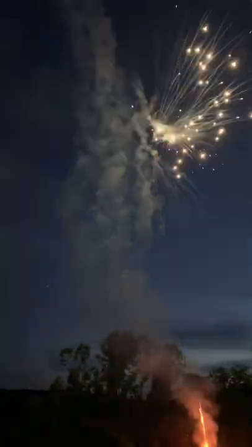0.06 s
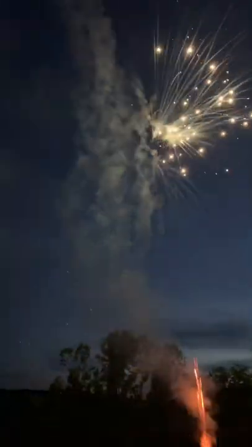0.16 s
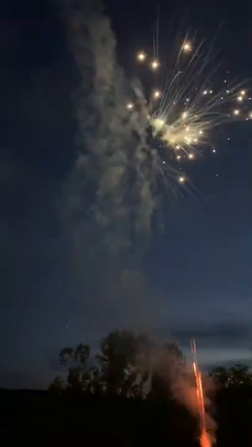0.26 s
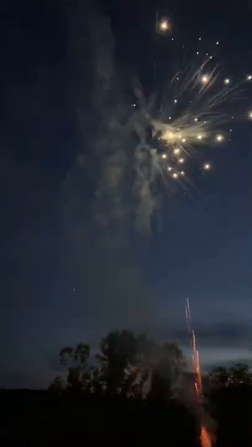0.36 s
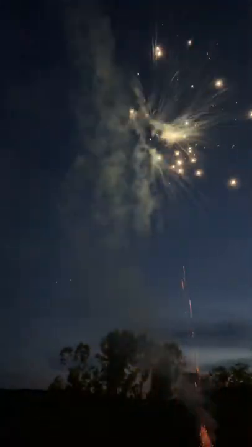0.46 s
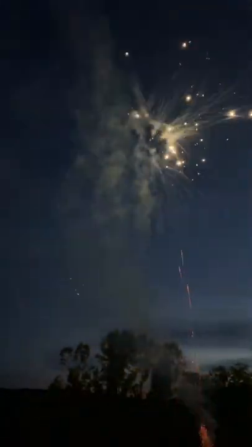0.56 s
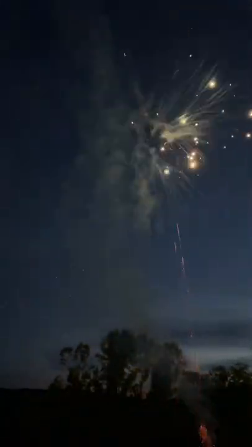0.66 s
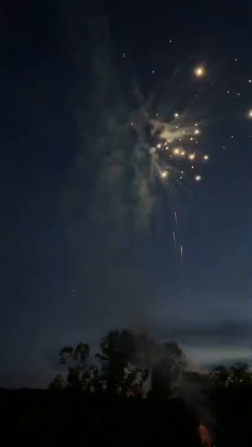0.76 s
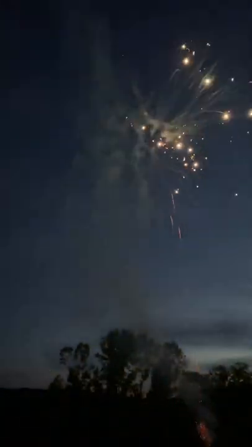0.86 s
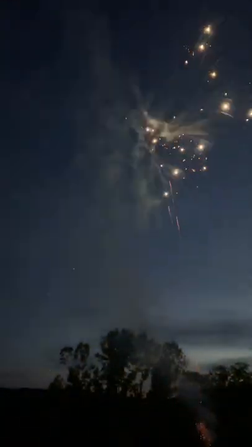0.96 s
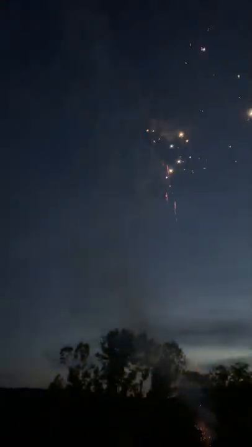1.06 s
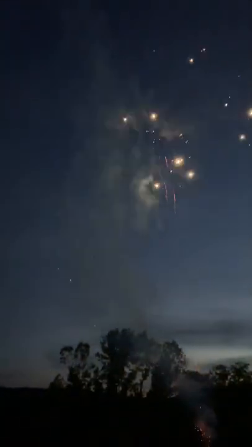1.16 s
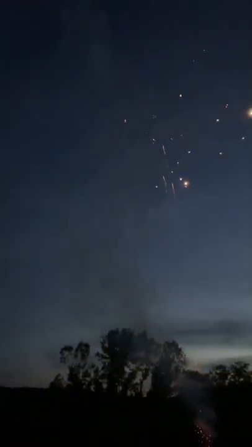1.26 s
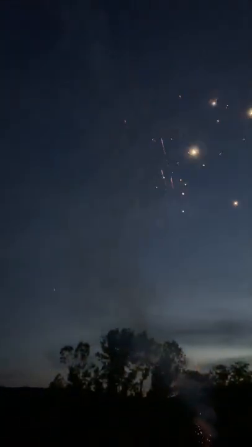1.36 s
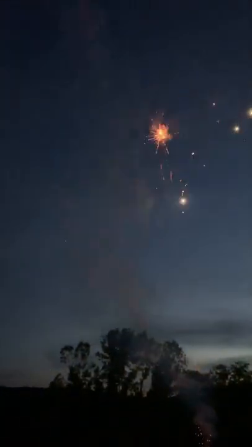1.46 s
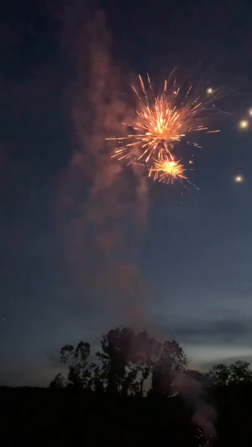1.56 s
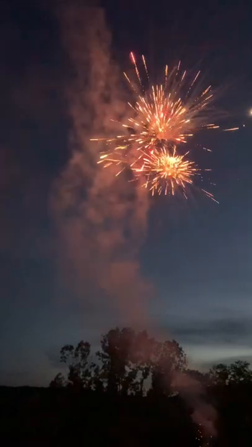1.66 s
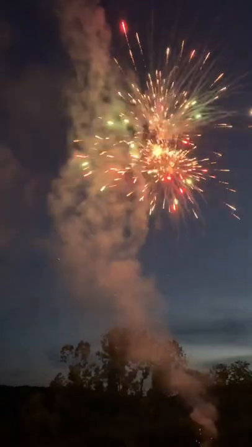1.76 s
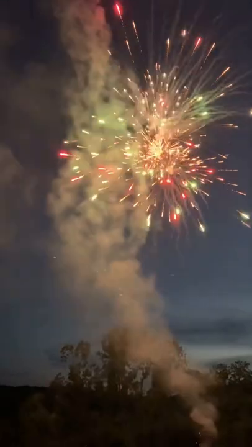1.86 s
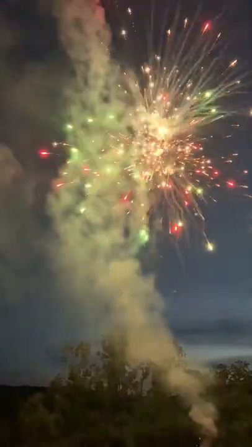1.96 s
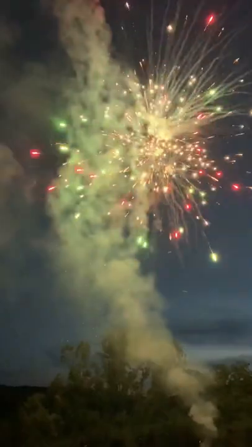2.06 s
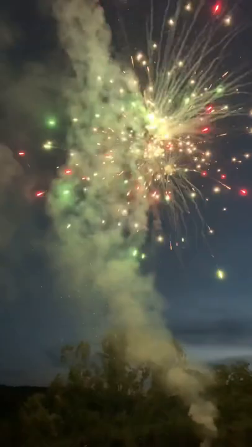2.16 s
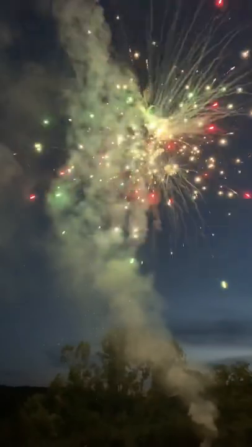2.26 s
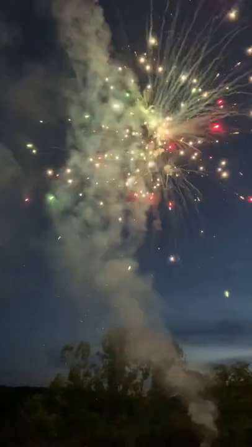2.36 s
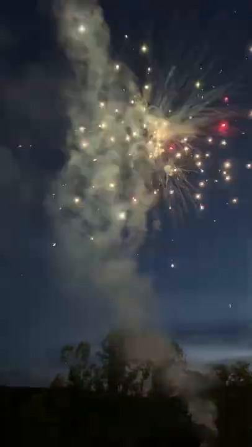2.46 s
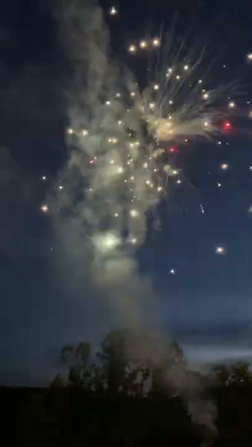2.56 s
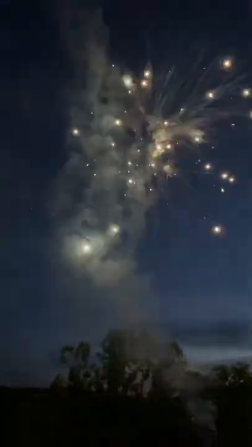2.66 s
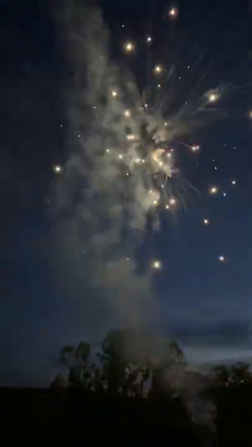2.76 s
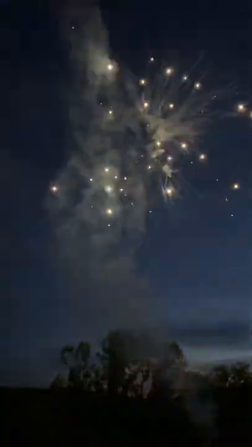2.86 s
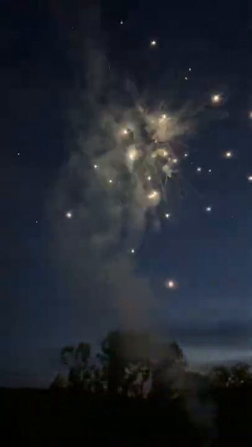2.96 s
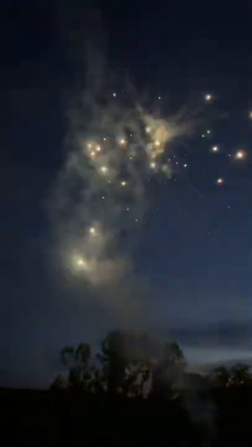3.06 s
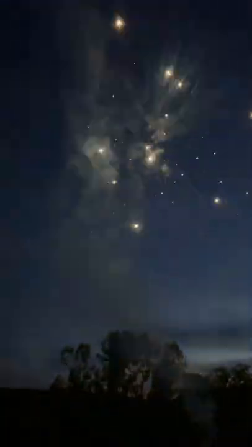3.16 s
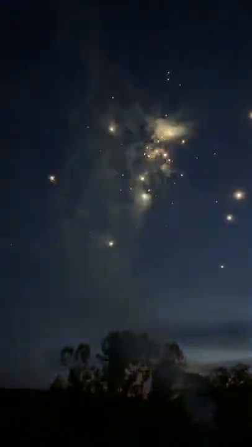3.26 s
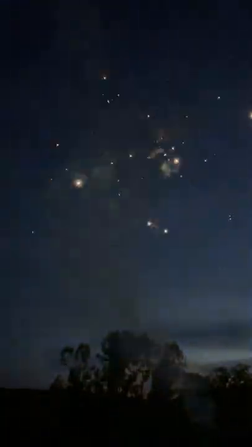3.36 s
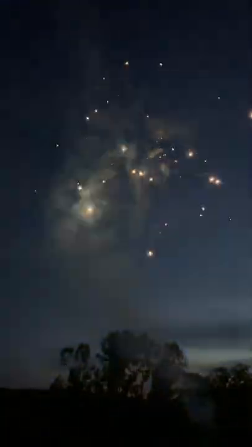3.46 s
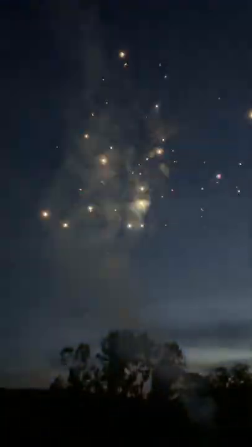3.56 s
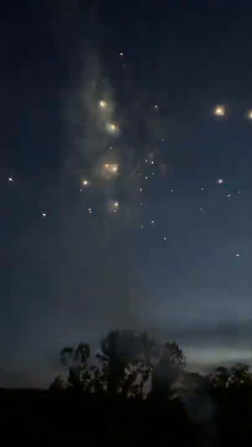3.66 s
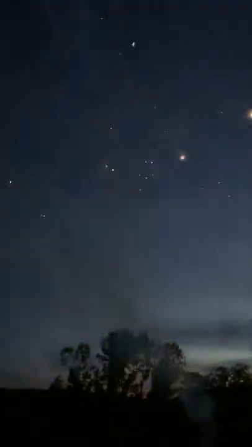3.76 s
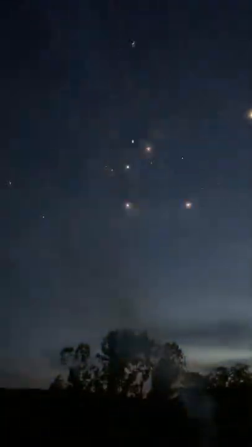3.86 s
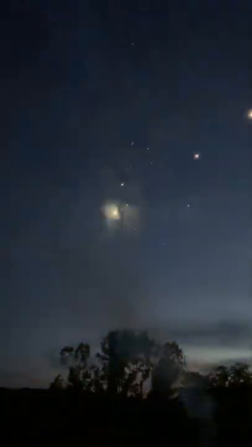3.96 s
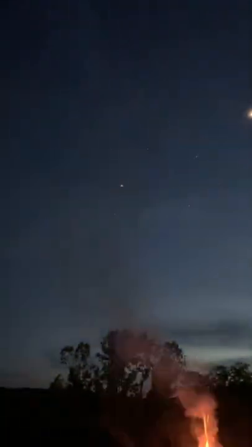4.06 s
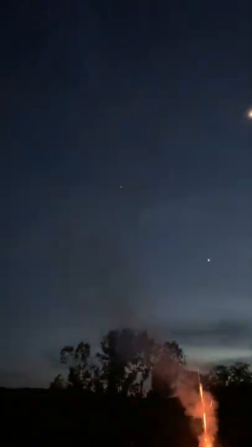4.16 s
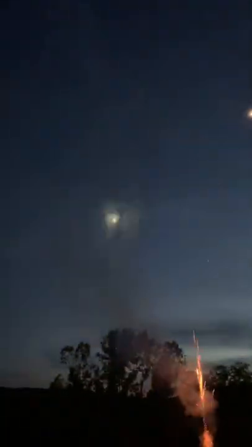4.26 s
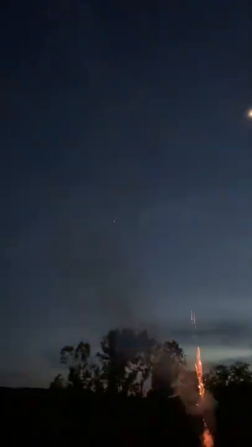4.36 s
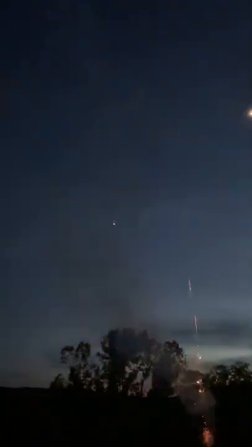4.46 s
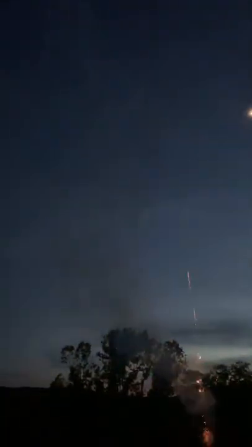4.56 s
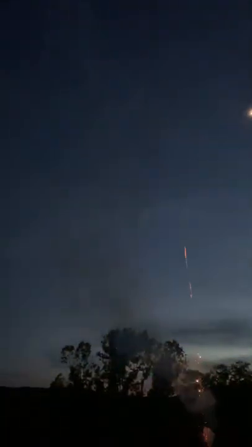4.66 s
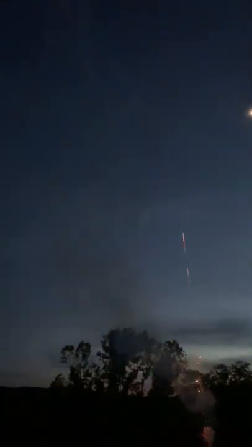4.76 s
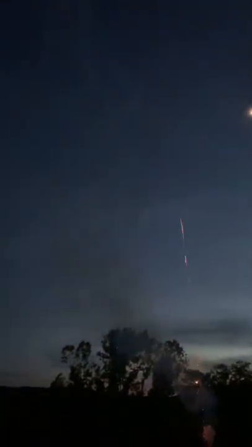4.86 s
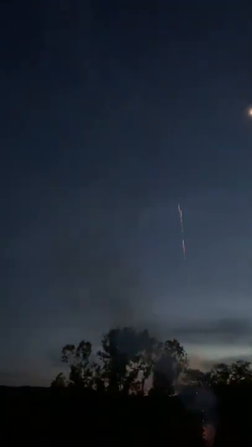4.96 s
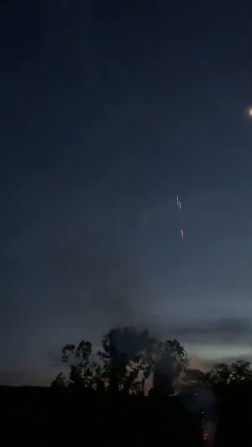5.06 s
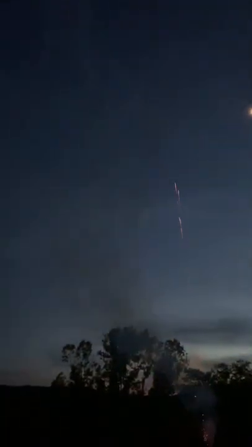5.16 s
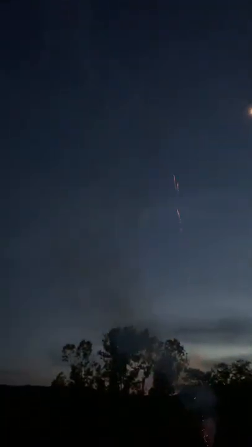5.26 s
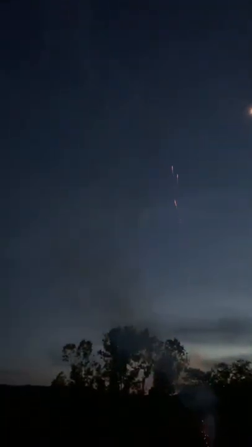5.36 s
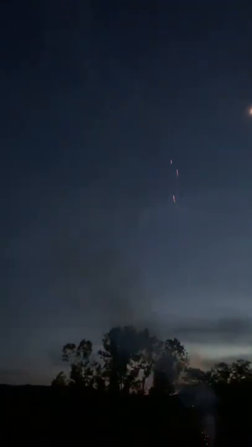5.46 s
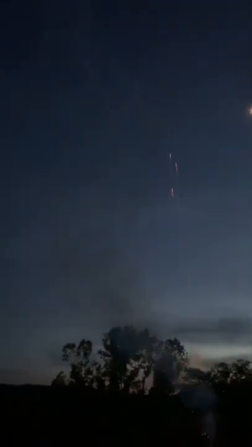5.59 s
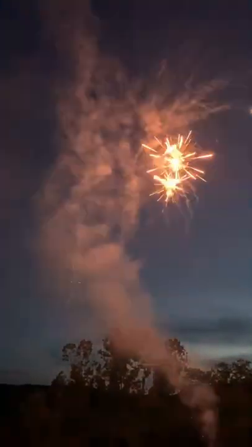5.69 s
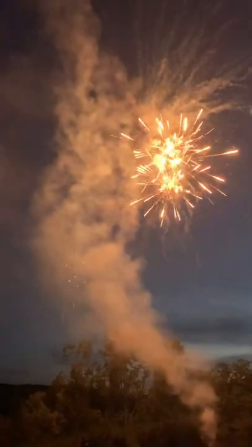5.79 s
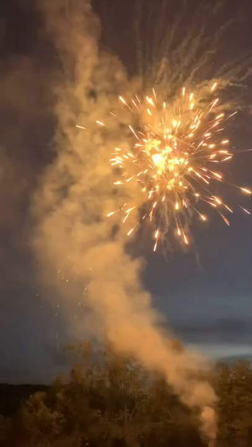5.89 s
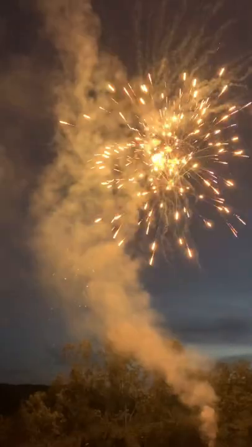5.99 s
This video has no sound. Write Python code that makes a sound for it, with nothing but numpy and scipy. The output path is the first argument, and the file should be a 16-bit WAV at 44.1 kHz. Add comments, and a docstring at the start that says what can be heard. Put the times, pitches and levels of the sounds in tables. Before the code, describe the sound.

Outdoor fireworks: quick triple thump, hissing fuses, sharp overhead bangs echoing off trees and houses, a lull, soft launches, another tight cluster of bangs.

```python
"""Two volleys of three fireworks thump out of their tubes over open ground at dusk and burst overhead about 1.6 s later.
Every bang cracks, trails its bass and comes back from trees and houses as a wash, a slap and a long low roll.
Fuses and scattered stars hiss as shaped noise, sparks snap dry, and faint evening air lies beneath.
The recorder smears a short swell of noise around each bang; its limiter ducks on peaks, then recovers steadily."""
import sys
import numpy as np
from scipy import signal
from scipy.fft import rfft, irfft, next_fast_len
from scipy.io import wavfile
from scipy.ndimage import uniform_filter1d

SR = 44100
rng = np.random.default_rng(int(sys.argv[2]) if len(sys.argv) > 2 else 0)


def master_out(mix):
    """Clip the mix to full scale and print it as 16-bit PCM to the path in sys.argv[1]."""
    frames = np.transpose(np.atleast_2d(mix))
    ceiling = np.clip(frames, -1, 1)
    pcm = np.round(ceiling * 32767).astype(np.int16)
    wavfile.write(sys.argv[1], SR, pcm)


N = 265923

# Shells leaving their tubes: (time [s], level [dB], brightness [dB/octave], echo [dB])
LAUNCH_SHOTS = [(0.0186, -7, 1.5, 12), (0.0655, 0.5, 1, 8), (0.116, -4.5, 1.29, 6), (4.027, -18, 1, -4.5),
                (4.0803, -16, 1.6, -2.5), (4.128, -21, .5, -4.5)]
# Shells bursting overhead:
# (time [s], level [dB], brightness [dB/octave], recorder smear [dB], smear lead [s], echo [dB])
BURST_SHOTS = [(1.506, 2.5, -1.5, 0.5, 0.013, 9), (1.594, 2.5, -0.5, -6, 0.0043, -2),
               (1.813, -1, -0.84, 0.5, 0.0023, 4.5), (5.723, -4.5, -1.3, -2, 0.0032, 2.5),
               (5.7449, 1.5, -1, -3, 0.00066, 4.5), (5.7854, -2, 0.43, -11, .001, -19)]
# Volleys climbing on burning fuses: (lift-off [s], burst [s], nominal hiss at lift-off [dB])
FLIGHTS = [(0.02, 1.515, -38.5), (4.03, 5.72, -55)]
# Sparks snapping: (time [s], peak before the common spark gain [dB], brightness [dB/octave])
SPARK_SNAPS = [(0.7108, -34, -5.5), (1.2292, -29.5, 6), (3.7014, -56, -8), (4.3903, -42, 0),
               (4.875, -58, -8)]

# Colour of the evening air: (frequency [Hz], relative density [dB per Hz])
AIR_COLOUR = [(25, -28), (60, 3), (90, -5.5), (125, -25.5), (200, -5), (290, -11.5), (400, -19), (480, -12),
              (620, -21), (1100, -20.5), (1700, -24.5), (2600, -45.5), (4200, -41.5), (8000, -61),
              (15000, -63.5)]
# Colour of a launch, bass-heavy: (frequency [Hz], relative density [dB per Hz])
THUMP_COLOUR = [(25, -27), (60, 1.5), (90, 2.5), (140, -4), (200, 0), (270, 1), (360, 6), (430, -2.5),
                (520, -19), (720, -13), (1000, -16.5), (1300, -26), (2300, -26), (4700, -38.5),
                (6500, -30.5), (9000, -38), (14000, -38.5)]
# Colour of the launch echoes: (frequency [Hz], relative density [dB per Hz])
LAUNCH_WASH_COLOUR = [(40, -9), (150, -10), (300, -1.5), (540, -8.5), (1000, -3.5), (1800, -6.5),
                      (3200, -13.5), (6500, -16.5), (8700, -26), (12900, -33.5), (15000, -41.5)]
# Colour of the burning fuses: (frequency [Hz], relative density [dB per Hz])
FUSE_COLOUR = [(120, -22.5), (210, -1), (290, -6), (570, -10.5), (1100, 0), (1700, 0), (2300, -15.5),
               (3200, -33), (5000, -32), (7500, -27.5), (11400, -40), (15000, -43)]
# Colour of a spark: (frequency [Hz], relative density [dB per Hz])
SNAP_COLOUR = [(500, -28), (2000, -14), (4000, -5), (7500, 0), (13000, -1), (16000, -10)]
# Colour of a burst: (frequency [Hz], relative density [dB per Hz])
BANG_COLOUR = [(25, -13), (50, -8), (100, -3), (180, -1), (240, -11.5), (330, 0.5), (420, -3), (510, -8),
               (650, -11.5), (1000, -17.5), (1500, -16.5), (2600, -26.5), (4500, -29.5), (8000, -33),
               (14000, -35)]
# Colour of the noise the recorder smears around a burst: (frequency [Hz], relative density [dB per Hz])
SMEAR_COLOUR = [(60, -26), (160, -22), (320, -2), (730, -1), (1200, -7.5), (1550, 1), (2000, -14),
                (2470, -11.5), (3700, -15), (7600, -28), (8800, -50.5), (15000, -67)]
# Colour of the burst echoes: (frequency [Hz], relative density [dB per Hz])
BURST_WASH_COLOUR = [(40, -22), (140, -15), (280, -3.5), (390, -4.5), (800, -13.5), (1700, -17),
                     (2800, -24.5), (4200, -25.5), (5000, -31), (7300, -31.5), (8900, -42.5), (13000, -47),
                     (15000, -64)]
# Colour of the scattered stars: (frequency [Hz], relative density [dB per Hz])
STAR_COLOUR = [(150, -11), (300, -4.5), (600, -6), (1200, 0.5), (2200, -6), (4000, -16), (5200, -33.5),
               (7000, -26.5), (12000, -45)]

# The low notes of a bang trail its crack: (frequency [Hz], delay before the trail factor [s])
BASS_TRAIL = [(30, 0.01975), (100, 0.0125), (200, .0056), (430, 0.0061), (700, 0.0016), (1500, .0009),
              (4000, .0003), (12000, 0.00014)]
# First launch reflections off ground and nearby walls: (delay [s], left gain [ratio], right gain [ratio])
LAUNCH_BOUNCES = [(.0014, 0.23, 0.28), (.004, .2, 0.23)]
# First burst reflections off the same: (delay [s], left gain [ratio], right gain [ratio])
BURST_BOUNCES = [(.0033, 0.55, 0.68), (.0078, 0.12, .4)]
# Trees and houses answering a launch: (arrival [s], spread [s], level [dB], t60 at 1 kHz [s],
# shortening of t60 with pitch [exponent], brightness [dB/octave])
LAUNCH_ECHOES = [(0.023, 0.018, -36, 1.04, 0.044, 4), (0.092, 0.016, -25.5, 0.46, 0.15, 1.05),
                 (.28, 0.011, -37.5, 0.49, 0.059, -3), (.35, .08, -55, 12, 0.18, -4)]
# Trees and houses answering a burst: (arrival [s], spread [s], level [dB], t60 at 1 kHz [s],
# shortening of t60 with pitch [exponent], brightness [dB/octave])
BURST_ECHOES = [(0.12, 0.05, -34, 1.14, 0.14, 6.5), (0.24, 0.0031, -24, .18, .1, -1.7),
                (0.14, 0.036, -31.5, 2.61, .14, -0.53), (.9, .2, -69.5, 15, 0.17, -0.5)]

# Left-right likeness of diffuse sound: (frequency [Hz], correlation [-1..1])
LIKENESS = [(60, 0.92), (130, 0.92), (290, 0.87), (640, 0.11), (1400, 0.28), (3100, 0.54), (6800, .2),
            (15000, .1)]
# Microphone colour, with a narrow treble notch: (frequency [Hz], level [dB])
MICROPHONE = [(20, 0), (8600, 0), (9000, -4), (9400, -22), (10100, -26), (10700, -2), (12800, 2),
              (13800, -1), (14600, -16), (16500, -19)]
# How much louder the left port hears than the right: (frequency [Hz], level [dB])
PORT_BALANCE = [(30, 1), (125, -3), (500, -3), (1500, -0.5), (4000, -0.3), (12000, 0.5)]

PORT_LAG_S = 0.00012  # diffuse sound reaches the right port this much later
EDGE_HZ = 16700  # upper band limit
BANG_S = .02  # a bang's level is the rms it would have packed into this time

FUSE_CATCH_S = .25  # the hiss builds as the fuses catch
CLIMB_FADE_DB_PER_S = 6  # it fades as the shells climb away
BURNOUT_DB_PER_S = 18.5  # extra fade once burnt out
STARS_DB, STARS_FADE_DB_PER_S, STARS_BURN_S = -54, 2.5, 2.4

# Time and frequency grids for steady noise (frames) and for single shots
FRAME, HOP = 1024, 256  # samples
FRAME_HZ = np.fft.rfftfreq(FRAME, 1 / SR)
FRAME_S = np.arange(N // HOP + 5)[:, None] * HOP / SR
SHOT_S = (np.arange(8192) - 2048) / SR
SHOT_HZ = np.fft.rfftfreq(len(SHOT_S), 1 / SR)


def amp(db):
    """Decibels to gain."""
    return 10 ** (np.asarray(db) / 20)


def unit(x):
    """Scales to rms 1."""
    return x / np.sqrt(np.mean(abs(x) ** 2) + 1e-20)


def read(points, hz):
    """Reads a table along a log-frequency axis."""
    f, value = np.transpose(points)
    return np.interp(np.log(hz + 1), np.log(f + 1), value)


def colour(points, hz, tilt_db=0):
    """A spectrum of unit power, tilted by so many dB an octave above 60 Hz."""
    octaves = np.log2(np.maximum(hz, 60))
    return unit(amp(read(points, hz) + tilt_db * octaves))


def delayed(hz, s):
    """Spectrum of a pure delay: phase falls in proportion to frequency."""
    return np.exp(-2j * np.pi * hz * s)


def add(mix, s, sound):
    """Mixes in a short stereo sound whose time zero falls at s."""
    start = round((s + SHOT_S[0]) * SR)
    sound = sound[:, max(-start, 0):]
    part = mix[:, max(start, 0):][:, :sound.shape[1]]
    part += sound[:, :part.shape[1]]


def paired(z, hz):
    """Makes two unrelated spectra as alike as scattered sound is at two close ports, left port first."""
    same = np.clip(read(LIKENESS, hz), -1, 1)
    mid = np.sqrt((1 + same) / 2) * z[0]
    side = np.sqrt((1 - same) / 2) * z[1]
    return np.array([mid + side, (mid - side) * delayed(hz, PORT_LAG_S)])


def scatter(decay_s):
    """Spectrum of a dying cluster of small reflections, of unit power."""
    envelope = np.exp(-abs(SHOT_S) / decay_s) * (SHOT_S > 0)
    taps = rng.standard_normal((2, len(SHOT_S))) * envelope
    return unit(paired(rfft(taps), SHOT_HZ))


def diffuse(gain, patchy_db, flicker_db):
    """Stereo noise under a frames x bins gain, uneven in patches and flickering as a whole."""
    shape = (len(FRAME_S), len(FRAME_HZ))
    noise = rng.standard_normal((2, N + 2048))
    z = signal.stft(noise, nperseg=FRAME, noverlap=FRAME - HOP)[2].swapaxes(1, 2)[:, :shape[0]]
    patches = uniform_filter1d(rng.standard_normal(shape), size=7, axis=0)
    patches = unit(uniform_filter1d(patches, size=12, axis=1))
    flicker = unit(uniform_filter1d(rng.standard_normal(FRAME_S.shape), size=4, axis=0))
    z = paired(z, FRAME_HZ) * gain * amp(patchy_db * patches + flicker_db * flicker)
    return signal.istft(z.swapaxes(1, 2), nperseg=FRAME, noverlap=FRAME - HOP)[1][:, :N]


def evening_air():
    """The faint bed of the open ground: steady diffuse noise, strongest in the bass."""
    return diffuse(amp(-54.5) * colour(AIR_COLOUR, FRAME_HZ), patchy_db=2.0, flicker_db=0.16)


def blasts(rows, spectrum, trail, lag_s, reflections, crack_hz, crack_s,
           clutter_db, clutter_s, rumble_db, rumble_s):
    """Each bang cracks, drops in pitch into a thump and rumbles briefly."""
    out, hz = np.zeros((2, N)), SHOT_HZ
    # summing delay over frequency gives the phase that holds each pitch back
    sweep = np.exp(-2j * np.pi * trail * np.cumsum(read(BASS_TRAIL, hz)) * hz[1])
    direct = delayed(hz, np.array([[0], [lag_s]]) - SHOT_S[0])  # right port lags
    small = hz ** 2 / (hz ** 2 + 300 ** 2)  # nearby surfaces are too small to return the bass
    large = (1 - small) * delayed(hz, 0.0053)  # it comes back later, from larger ones
    bounces = small * sum(np.array([[left], [right]]) * delayed(hz, s) for s, left, right in reflections)
    ragged = hz ** 2 / (hz ** 2 + crack_hz ** 2)  # short waves arrive broken up, long ones whole
    for s, db, tilt_db, *_ in rows:
        front = np.sqrt(1 - ragged) * direct + np.sqrt(ragged) * scatter(crack_s)
        clutter = amp(clutter_db) * small * scatter(clutter_s)
        rumble = amp(rumble_db) * large * scatter(rumble_s)
        arrivals = front * (1 + bounces) + clutter + rumble
        bang = irfft(colour(spectrum, hz, tilt_db) * sweep * arrivals)
        add(out, s, amp(db) * unit(bang) * np.sqrt(BANG_S * SR / len(SHOT_S)))
    return out


def recorder_smear(rows, spectrum, tilt_db, rise_s):
    """The recorder smears a short noise swell around each bang; rows are (time [s], level [dB], lead [s])."""
    out = np.zeros((2, N))
    for s, db, lead_s in rows:
        noise = paired(rfft(rng.standard_normal((2, len(SHOT_S)))), SHOT_HZ)
        rise = (1 + np.tanh((SHOT_S + lead_s) / rise_s)) / 2
        swell = rise * np.exp(-np.maximum(SHOT_S, 0) / 0.0057)
        add(out, s, amp(db) * swell * unit(irfft(noise * colour(spectrum, SHOT_HZ, tilt_db))))
    return out


def launches():
    """Launch thumps; recorder noise, set 10 dB below the listed level, swells around each."""
    thumps = blasts(LAUNCH_SHOTS, THUMP_COLOUR, trail=1.02, lag_s=.00004, reflections=LAUNCH_BOUNCES,
                    crack_hz=3140, crack_s=0.00093, clutter_db=-4.5, clutter_s=0.0073,
                    rumble_db=-10.5, rumble_s=0.02)
    rows = [(s, db - 10, 0) for s, db, *_ in LAUNCH_SHOTS]
    return thumps + recorder_smear(rows, THUMP_COLOUR, tilt_db=2, rise_s=.009)


def echoes(rows, paths, spectrum, patchy_db, flicker_db):
    """Each group of trees and houses returns every bang as a wash that builds, then dies treble first."""
    response = 0
    for arrival_s, spread_s, db, t60, damping, tilt_db in paths:
        late_s = FRAME_S - arrival_s
        build = (1 + np.tanh(late_s / (2 * spread_s))) / 2
        pitch_loss = (np.maximum(FRAME_HZ, 200) / 1000) ** damping
        fade = amp(-60 * np.maximum(late_s, 0) / t60 * pitch_loss)
        response = response + build * (amp(db) * fade * colour(spectrum, FRAME_HZ, tilt_db)) ** 2
    power = np.zeros_like(response)
    for s, *_, echo_db in rows:
        first = np.searchsorted(FRAME_S[:, 0], s)
        power[first:] += amp(echo_db) ** 2 * response[:len(power) - first]
    return diffuse(np.sqrt(power), patchy_db, flicker_db)


def fuse_level():
    """The fuses catch, fade as they climb and die away after the burst."""
    level = 0
    for lift_s, burst_s, db in FLIGHTS:
        flown_s = np.maximum(FRAME_S - lift_s, 0)
        after_s = np.maximum(FRAME_S - burst_s, 0)
        caught = np.minimum(flown_s / FUSE_CATCH_S, 1)
        fade_db = CLIMB_FADE_DB_PER_S * flown_s + BURNOUT_DB_PER_S * after_s
        level = level + caught * amp(db - fade_db)
    return level


def burning(directness):
    """Fuse hiss from one side of the sky: shaped noise that reaches the right port a moment later."""
    left, stray = diffuse(fuse_level() * colour(FUSE_COLOUR, FRAME_HZ), patchy_db=1.3, flicker_db=.3)
    later = np.pad(left, (6, 0))[:N]  # six samples
    share = np.clip(directness, 0, 1)
    return np.array([left, share * later + (1 - share) * stray])


def sparks(level_db, snap_s, tail_db, tail_s):
    """Tiny dry snaps of scattered noise, each with a faint tail."""
    out = np.zeros((2, N))
    for s, db, tilt_db in SPARK_SNAPS:
        body = scatter(snap_s) + amp(tail_db) * scatter(tail_s)
        snap = irfft(colour(SNAP_COLOUR, SHOT_HZ, tilt_db) * body)
        add(out, s, amp(db + level_db) * snap / abs(snap).max())
    return out


def bursts():
    """Shells crack open overhead; the recorder smears a short noise swell ahead of each bang."""
    bangs = blasts(BURST_SHOTS, BANG_COLOUR, trail=.9, lag_s=.00002, reflections=BURST_BOUNCES,
                   crack_hz=2800, crack_s=0.0018, clutter_db=-1.5, clutter_s=.012,
                   rumble_db=-14, rumble_s=0.032)
    rows = [(s, db, lead_s) for s, _, _, db, lead_s, _ in BURST_SHOTS]
    return bangs + recorder_smear(rows, SMEAR_COLOUR, tilt_db=0, rise_s=0.0054)


def stars():
    """After each volley bursts, its scattered stars catch and burn down with a thinner hiss."""
    level = 0
    for _, burst_s, _ in FLIGHTS:
        after_s = np.maximum(FRAME_S - burst_s, 0)
        spent_s = np.maximum(FRAME_S - burst_s - STARS_BURN_S, 0)
        caught = np.minimum(after_s / FUSE_CATCH_S, 1)
        fade_db = STARS_FADE_DB_PER_S * after_s + BURNOUT_DB_PER_S * spent_s
        level = level + caught * amp(STARS_DB - fade_db)
    return diffuse(level * colour(STAR_COLOUR, FRAME_HZ), patchy_db=1.8, flicker_db=-2.0)


def scene():
    """Launches and bursts with their echoes, over burning hiss, sparks and the evening air."""
    wash = echoes(LAUNCH_SHOTS, LAUNCH_ECHOES, LAUNCH_WASH_COLOUR, patchy_db=1.6, flicker_db=.4)
    snaps = sparks(level_db=13, snap_s=.0009, tail_db=-4, tail_s=.013)
    roll = echoes(BURST_SHOTS, BURST_ECHOES, BURST_WASH_COLOUR, patchy_db=1.5, flicker_db=.5)
    return evening_air() + launches() + wash + burning(directness=0.82) + snaps + bursts() + roll + stars()


def limit(x, ceiling_db, recovery_db):
    """Drops the gain almost at once on a peak above the ceiling and recovers by recovery_db a second."""
    over_db = np.maximum(20 * np.log10(abs(x).max(0) + 1e-9) - ceiling_db, 0)
    ramp = np.arange(N) * recovery_db / SR
    held_db = np.maximum.accumulate(over_db + ramp) - ramp
    return x * amp(-uniform_filter1d(held_db, size=40))


def record(dry):
    """Limiter, soft overload, microphone colour and band limit."""
    limited = limit(dry, ceiling_db=-0.5, recovery_db=40)
    clipped = limited / (1 + limited ** 4) ** (1 / 4)
    size = next_fast_len(N + 4096)
    hz = np.fft.rfftfreq(size, 1 / SR)
    balance_db = np.array([[.5], [-.5]]) * read(PORT_BALANCE, hz)  # half to each port
    response = amp(read(MICROPHONE, hz) + balance_db)
    coloured = irfft(rfft(clipped, size) * response, size)[:, :N]
    lowpass = signal.firwin(511, EDGE_HZ, window=("kaiser", 9), fs=SR)
    return signal.oaconvolve(coloured, lowpass[None], "same")


dry = scene()
out = record(dry)
master_out(out)
```